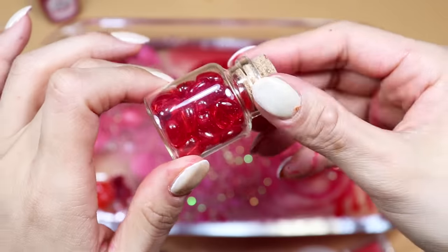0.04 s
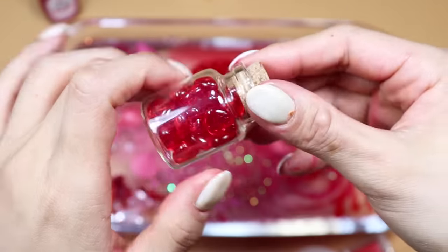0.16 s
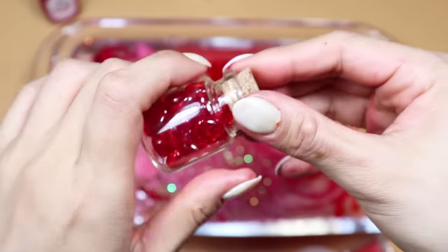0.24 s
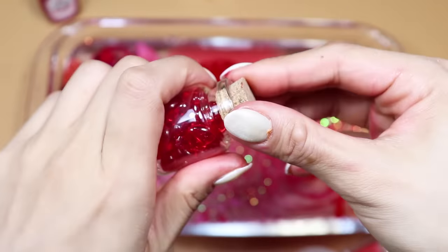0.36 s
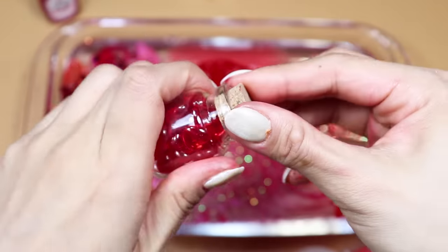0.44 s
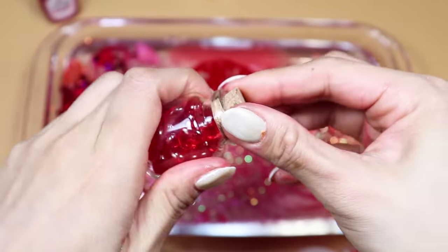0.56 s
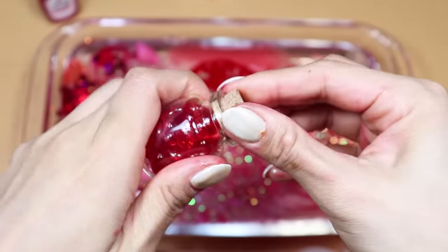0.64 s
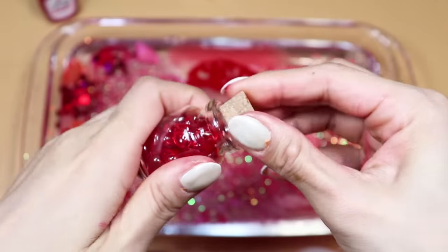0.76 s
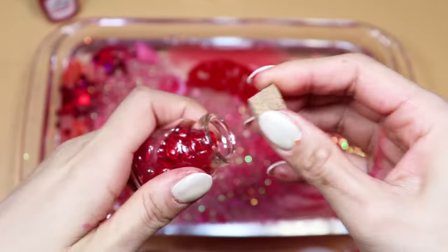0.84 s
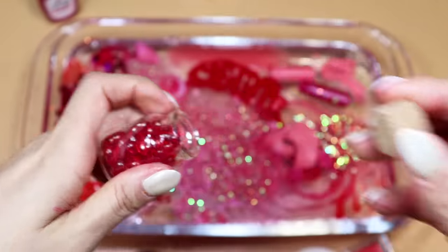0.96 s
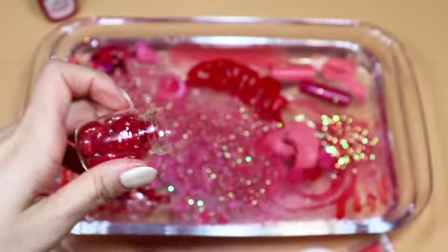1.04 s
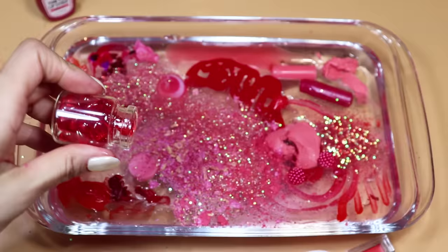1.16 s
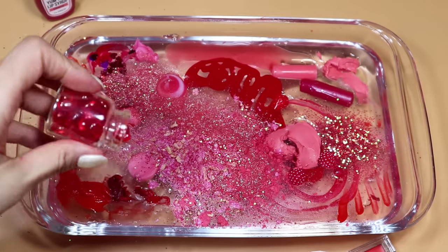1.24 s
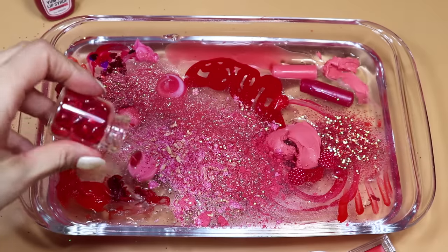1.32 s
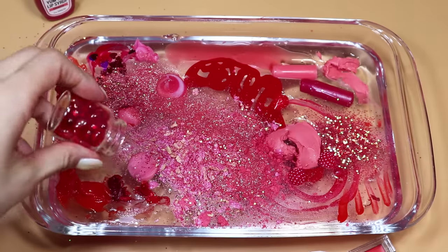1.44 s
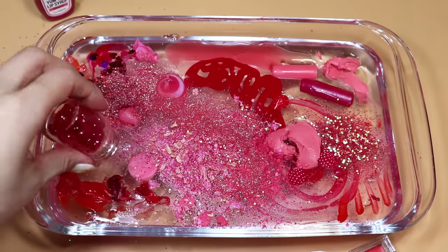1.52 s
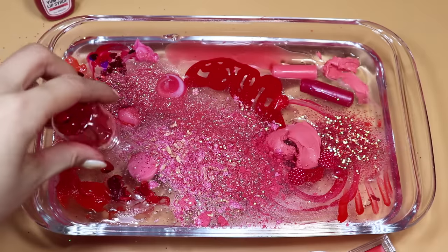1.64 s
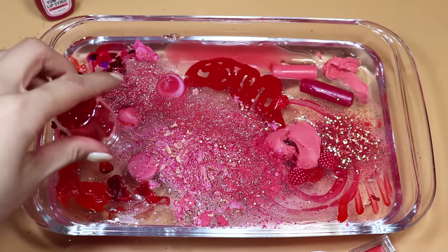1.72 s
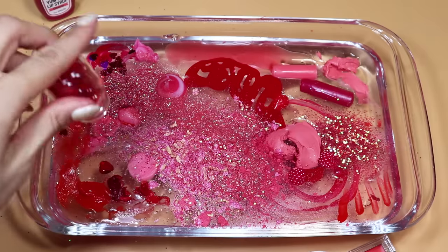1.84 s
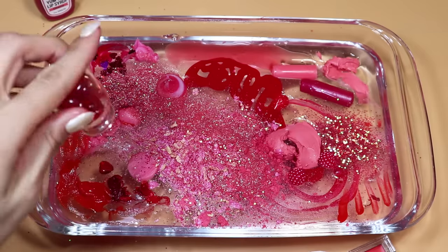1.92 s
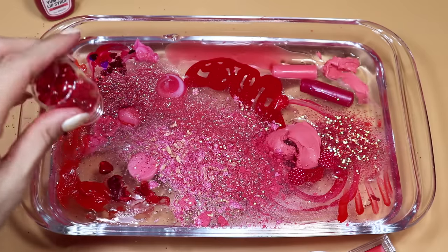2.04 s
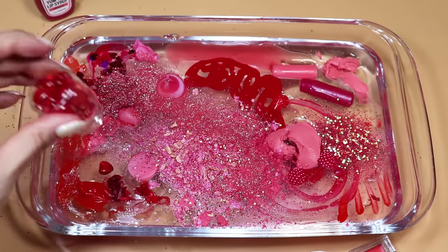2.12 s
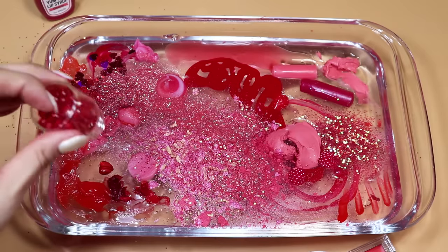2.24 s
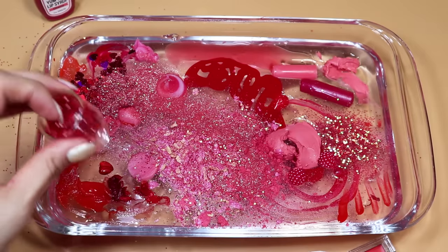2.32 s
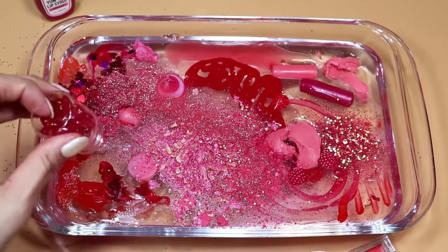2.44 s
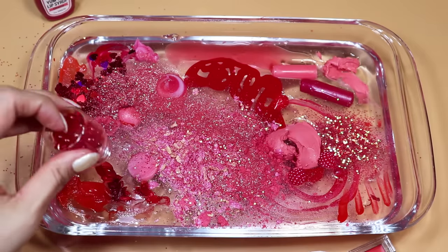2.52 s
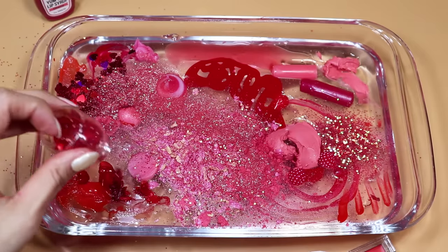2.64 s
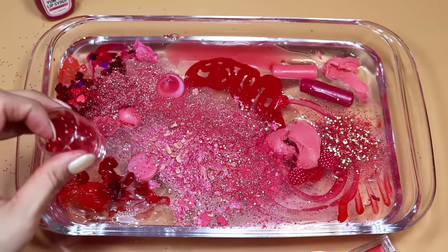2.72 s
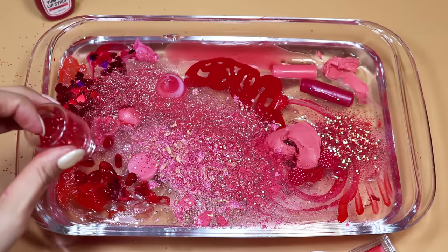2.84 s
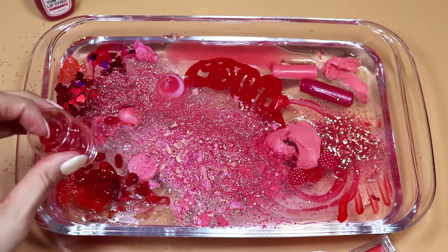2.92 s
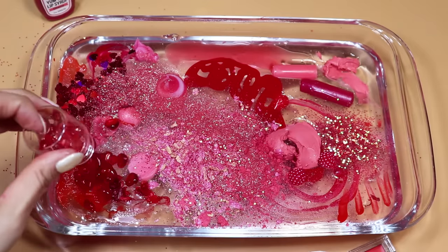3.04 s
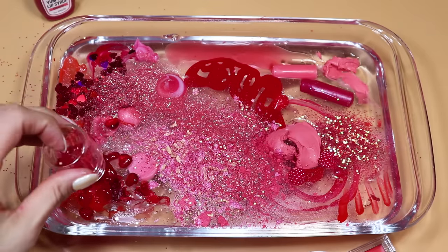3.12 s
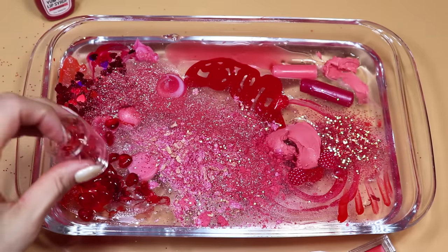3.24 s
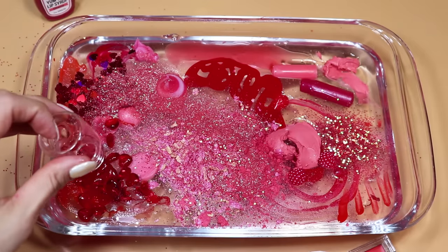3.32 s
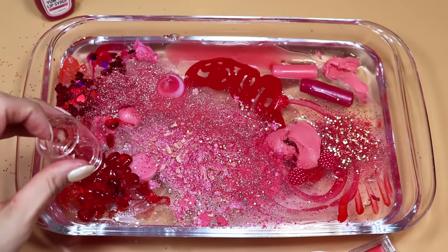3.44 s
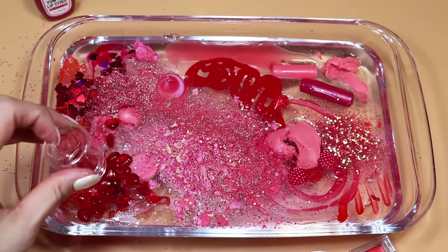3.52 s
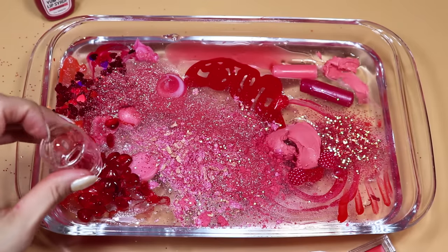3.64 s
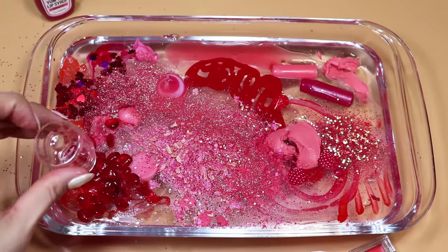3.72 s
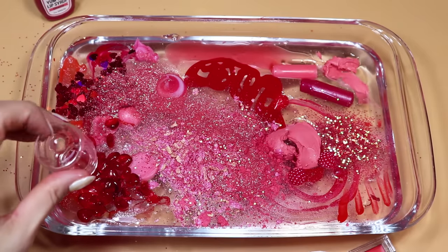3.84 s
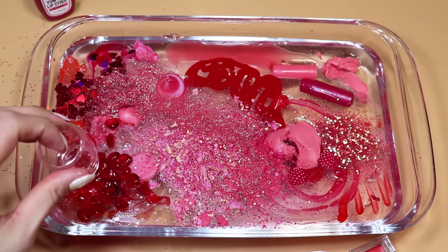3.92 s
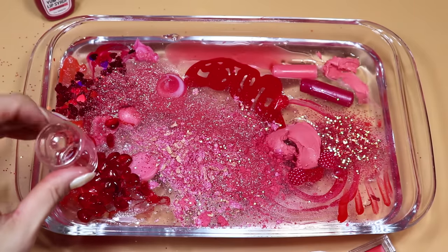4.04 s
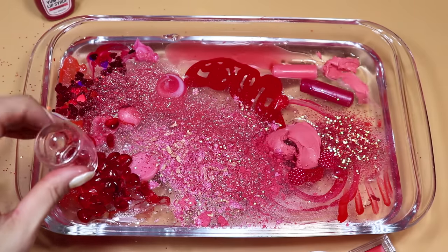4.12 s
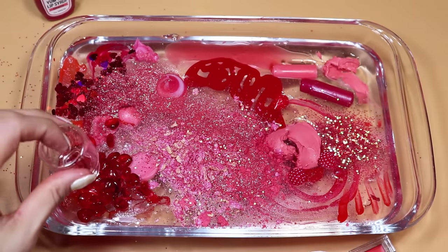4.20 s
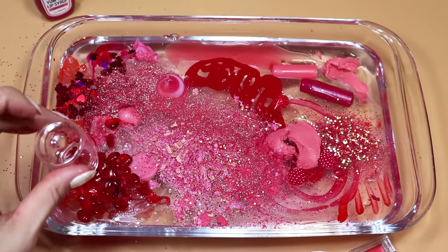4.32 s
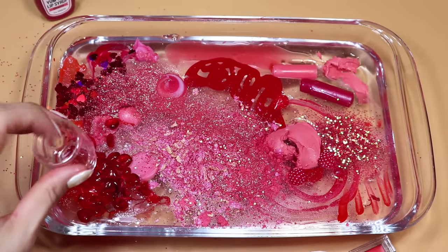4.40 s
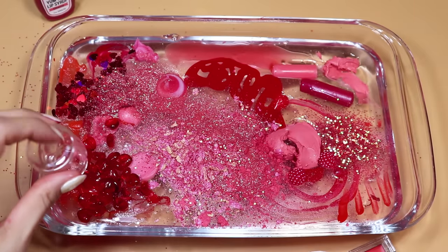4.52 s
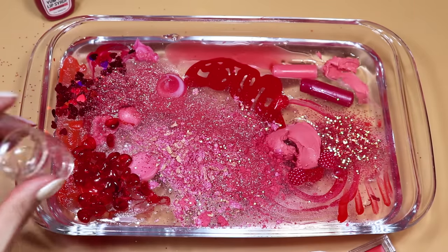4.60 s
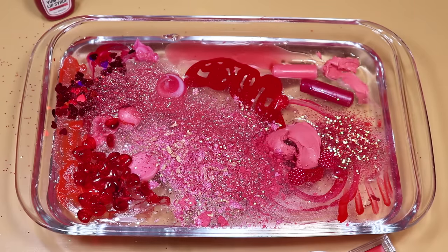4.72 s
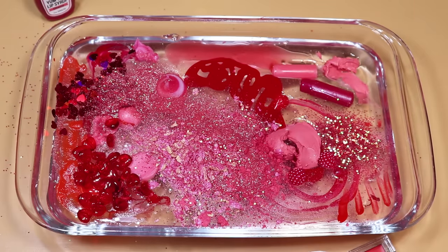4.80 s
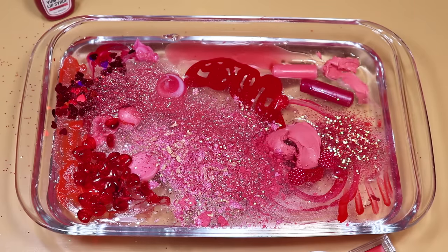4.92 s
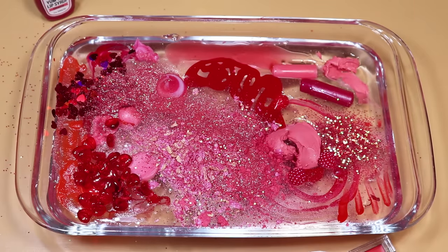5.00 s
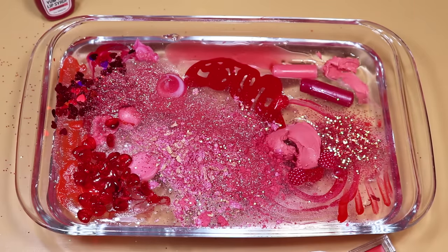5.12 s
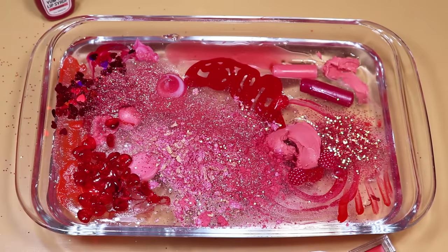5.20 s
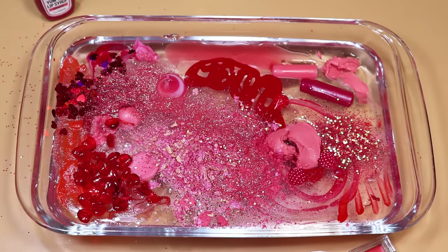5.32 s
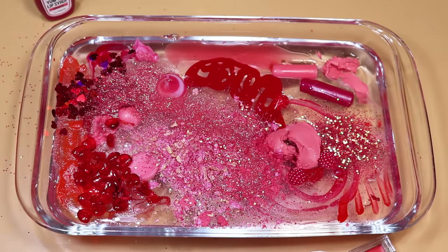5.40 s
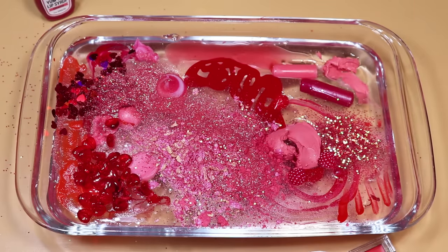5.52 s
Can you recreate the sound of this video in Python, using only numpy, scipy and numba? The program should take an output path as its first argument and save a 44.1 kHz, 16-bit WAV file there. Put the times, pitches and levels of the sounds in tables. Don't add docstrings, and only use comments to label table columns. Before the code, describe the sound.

Close stereo capture, slightly left: a few delicate ticks, then a light flurry of glassy clicks as beads shift in a small bottle. A dense, uneven rattle comes in short spurts for over a second, brittle and high with a little hollow knock from the bottle's air. It stops abruptly, leaving isolated taps, one soft plop, and faint indoor hum and hiss.

```python
import sys
import numpy as np
from scipy import signal
from scipy.fft import rfft, irfft, next_fast_len
from scipy.io import wavfile
from scipy.ndimage import uniform_filter1d
from numba import njit

SR = 44100
rng = np.random.default_rng(int(sys.argv[2]) if len(sys.argv) > 2 else 0)


def store_pcm(level_fs):
    pcm = np.round(np.clip(level_fs, -1, 1) * 32767).astype(np.int16)
    wavfile.write(sys.argv[1], SR, np.atleast_2d(pcm).T)


def ratio(d):
    e = np.asarray(d, float) / 20
    return 10 ** e


N = 245333


def rms_one(x):
    return x / np.sqrt(np.mean(x ** 2) + 1e-20)


def in_time(rows, column):
    rows = np.array(rows, float)
    return np.interp(np.arange(N) / SR, rows[:, 0], rows[:, column])


def band(x, low_hz, high_hz):
    return signal.sosfilt(signal.butter(3, [low_hz, high_hz], "band", fs=SR, output="sos"), x)


@njit
def resonate(x, angle, r):
    y = np.zeros(len(x))
    for i in range(2, len(x)):
        y[i] = np.sin(angle[i]) * x[i - 1] + 2 * r * np.cos(angle[i]) * y[i - 1] - r * r * y[i - 2]
    return y


def ring(clicks, hz, width_hz):
    angle = 2 * np.pi * hz / SR * np.ones(N)
    return resonate(clicks + 1e-18, angle, np.exp(-np.pi * width_hz / SR))


# f/Hz, density/dB per Hz
ROOM_TONE = [(18, -54), (30, -31), (53, -2.5), (138, -4), (170, -4), (233, -3), (364, -10), (649, -10),
             (721, -14.5), (1350, -14.5), (1460, -15), (1590, -16.5), (12000, -30), (13300, -100),
             (16000, -33)]
# f/Hz, correlation/1
ROOM_LIKENESS = [(60, 0.84), (130, 0.62), (290, 0.55), (640, 0.29), (1410, -0.036), (3100, -0.05),
                 (6820, 0.17), (15000, -0.41)]
# f/Hz, width/Hz, level/dB
APPLIANCE_WHINES = [(1330, 47, -71), (13200, 28, -108)]


def background():
    tone_db, settle = -53 + 1.38, 8000
    edges_hz = 28 * 2 ** np.arange(0, 9.6, .5)
    white = rng.standard_normal((2, 2, N + settle))
    tone = 0
    for k, (low, high) in enumerate(zip(edges_hz, edges_hz[1:])):
        sos = signal.butter(2, [low, high], "band", fs=SR, output="sos")
        mid, side = signal.sosfilt(sos, white[k % 2])[:, settle:]
        log_centre = np.log(low * high) / 2
        tone_hz, density_db = np.transpose(ROOM_TONE)
        likeness_hz, likeness = np.transpose(ROOM_LIKENESS)
        level_db = np.interp(log_centre, np.log(tone_hz), density_db)
        alike = np.clip(np.interp(log_centre, np.log(likeness_hz), likeness), -1, 1)
        tone = tone + ratio(level_db) * (np.sqrt(1 + alike) * mid + np.sqrt(1 - alike) * side * [[1], [-1]])
    whines = 0
    for hz, width_hz, db in APPLIANCE_WHINES:
        once = ring(rng.standard_normal(N), hz, width_hz)
        whines = whines + ratio(db) * rms_one(ring(once, hz, width_hz))
    return ratio(tone_db) * rms_one(tone) + whines


# t/s, f/Hz
AIR_PITCH = [(0.8, 1700), (1.08, 1700), (1.19, 1670), (1.67, 1810), (2.21, 1795), (2.93, 1370), (3.1, 1360),
             (3.58, 1555), (4.7, 1540)]
# t/s, f/Hz, level/dB
CROSS_MODE = [(0.8, 5100, 0), (1.11, 4400, 7), (1.26, 4140, 10.5), (1.33, 5450, 6), (2.76, 5430, -2.5),
              (3.03, 6460, -1), (3.3, 6630, -4.5), (3.6, 6600, -13)]
# f/Hz, width/Hz, level/dB
BODY_MODES = [(2730, 460, -22), (3800, 6800, -10.5), (7880, 1500, -1.5), (9630, 2070, 5)]
# f/Hz, width/Hz, level/dB
CRACK_MODES = [(15650, 1700, 0), (13900, 1500, -6), (11600, 2500, -14)]
# f/Hz, width/Hz, level/dB
WALL_MODES = [(15080, 110, 0), (15300, 150, -5), (13600, 300, -14)]


def bottle(strike, air, body, crack, wall, cavity_db):
    def modes(table, strength, first):
        return sum(ratio(db) * ring(strike(strength, first + k), hz, width_hz)
                   for k, (hz, width_hz, db) in enumerate(table))

    air_hz = in_time(AIR_PITCH, 1)
    thump = ring(strike(air, 0), air_hz, 85)
    thump = thump + ratio(-10.5) * ring(strike(air, 12), 2.9 * air_hz, 500)
    thump = thump + ratio(-4.5) * ring(strike(air, 12), 1.36 * air_hz, 300)
    cross_gain = ratio(cavity_db + in_time(CROSS_MODE, 2))
    middle = cross_gain * ring(strike(body, 1), in_time(CROSS_MODE, 1), 420)
    middle = middle + modes(BODY_MODES, body, 2)
    top = modes(CRACK_MODES, crack, 6) + modes(WALL_MODES, wall, 9)
    return band(thump, 780, 3200), band(middle, 2220, 12000), band(top, 10300, 19000)


# t/s, crack peak/dB, body peak/dB, air peak/dB
FAINT_TICKS = [(0.384, -58, -48, -56), (0.4024, -67, -55, -55), (0.8358, -63, -42, -53),
               (0.8396, -61, -51, -59), (0.8677, -63, -57, -56), (0.883, -52, -53, -54),
               (0.888, -48, -46, -56), (0.8967, -45, -41, -44), (0.9048, -53, -59, -60),
               (1.1094, -51, -52, -61), (1.1973, -67, -55, -64), (1.2116, -35, -29.5, -44),
               (1.2378, -34, -35.5, -48), (1.291, -58, -42, -37.5), (1.3099, -44, -38, -44),
               (1.333, -48, -46, -50), (1.3372, -41, -34.5, -43), (1.3623, -38, -39, -45),
               (1.3681, -45, -36.5, -54), (1.381, -37, -48, -45), (1.481, -62, -51, -49),
               (1.658, -40, -41.5, -49), (1.723, -60, -52, -63), (1.735, -39, -39.5, -38),
               (1.7836, -51, -44, -47), (2.119, -42, -51, -59), (2.1503, -39, -49, -54),
               (2.1587, -39, -49, -49), (2.2022, -39, -44, -46), (4.7437, -48, -48, -55)]
# t/s, crack peak/dB, body peak/dB, air peak/dB
BEAD_KNOCKS = [(2.32, -28.0, -26.0, -29.0), (2.3896, -41.0, -40.0, -58.0), (2.4496, -26.0, -24.0, -28.0),
               (2.4664, -20.0, -21.0, -28.0), (2.5139, -30.0, -38.0, -56.0), (2.6016, -28.0, -28.0, -29.0),
               (2.6402, -27.0, -29.0, -40.0), (2.7175, -23.0, -25.0, -30.0), (2.7517, -21.0, -27.0, -43.0),
               (2.7597, -23.0, -24.0, -42.0), (2.8244, -25.0, -26.0, -45.0), (2.866, -23.0, -31.0, -28.0),
               (2.9235, -22.0, -26.0, -47.0), (2.951, -27.0, -25.0, -39.0), (2.9685, -26.0, -35.0, -40.0),
               (2.9888, -24.0, -30.0, -36.0), (3.0249, -21.0, -34.0, -48.0), (3.0367, -18.0, -30.0, -47.0),
               (3.0659, -26.0, -26.0, -33.0), (3.1, -25.0, -28.0, -34.0), (3.142, -21.0, -33.0, -40.0),
               (3.2263, -32.0, -34.0, -35.0), (3.2566, -18.0, -29.0, -37.0), (3.5191, -26.0, -29.0, -68.0),
               (3.547, -36, -40, -60), (3.5785, -25, -32, -60), (3.646, -45, -52, -65),
               (3.315, -28, -34, -45), (2.618, -32, -34, -36), (3.172, -31, -36, -55)]
# t/s, crack peak/dB, body peak/dB, air peak/dB
WALL_RINGS = [(2.9935, -20.0, -31.0, -48.0), (3.003, -24, -32, -36), (3.012, -25, -33, -36),
              (3.3683, -19.0, -28.0, -31.0), (3.3875, -18.0, -24.0, -29.0), (3.3967, -23.0, -33.0, -35.0),
              (3.4049, -21.0, -28.0, -42.0), (3.4599, -20.0, -26.0, -31.0)]
# t/s, crack peak/dB, body peak/dB, air peak/dB, wall re crack/dB
GLASS_STRIKES = [(1.9674, -7.0, -39, -46.0, -33.0), (2.2589, -19.0, -36, -44.0, -10.0),
                 (2.2636, -17.0, -30, -38.0, -4.0), (2.2678, -9.0, -30, -45.0, -25.0),
                 (2.4025, -8.0, -31, -40.0, -17.0), (2.4058, -9.0, -30, -41.0, -27.0),
                 (2.4116, -13.0, -26, -47.0, -22.0), (2.5518, -8.0, -31, -39.0, -32.0),
                 (2.5586, -9.0, -33, -56.0, -30.0), (2.6284, -18.0, -29, -37.0, -29.0),
                 (2.6811, -7.0, -35, -39.0, -18.0), (2.6957, -11.0, -33, -56.0, -15.0),
                 (2.8109, -18.0, -25, -42.0, -26.0), (2.8739, -16.0, -30, -36.0, -18.0),
                 (3.1128, -17.0, -32, -41.0, -24.0), (3.1966, -18.0, -30, -47.0, -33.0),
                 (3.2369, -18.0, -25, -29.0, -23.0), (3.2976, -17.0, -34, -55.0, -28.0),
                 (3.3583, -13.0, -22, -34.0, -31.0), (3.487, -16.0, -25, -56.0, -22.0),
                 (3.573, -17.0, -25, -51.0, -31.0), (3.9949, -19.0, -42, -44.0, -34.0),
                 (4.2697, -11.0, -37, -38.0, -38.0), (4.535, -12.0, -37, -37.0, -32.0)]


def blows():
    mode_spread_db, side_spread_db = 1.2, 1.2
    rattle_s, echo_s, echo_db = .0014, .00063, -20
    # wall re crack/dB, left re right/dB
    rows = [(*row, -24, 2) for row in FAINT_TICKS]
    rows += [(*row, -21, 3) for row in BEAD_KNOCKS]
    rows += [(*row, -1.5, 3) for row in WALL_RINGS]
    rows += [(*row[:4], row[4] + 7, 5.5) for row in GLASS_STRIKES]
    s, crack_db, body_db, air_db, wall_db, left_db = np.transpose(rows)
    at = np.round(s * SR).astype(int)
    mode_luck, side_luck = rng.standard_normal((2, len(s), 13))
    chatter, fade = rng.standard_normal((6, N)), np.exp(-1 / (rattle_s * SR))
    sides = []
    for side in (1, -1):
        def strike(db, k):
            pan_db = side_spread_db * side_luck[:, k] + left_db / 2
            off_centre = side * (k % 12 > 0)
            clicks = np.zeros(N)
            clicks[at] = ratio(db + mode_spread_db * mode_luck[:, k] + off_centre * pan_db)
            if 0 < k < 6:
                rattle = chatter[k] * signal.lfilter([1], [1, -fade], clicks)
                return 0.9 * clicks + 0.65 * rattle
            return clicks
        parts = bottle(strike, air_db - 0.5, body_db - 1.0, crack_db + 2, crack_db + wall_db, cavity_db=-14)
        sides.append(sum(parts))
    direct = np.array(sides)
    return direct + ratio(echo_db) * np.roll(direct, int(echo_s * SR), axis=1)


def place(x):
    lead_s, size = .000056, next_fast_len(N)
    hz = np.arange(size // 2 + 1) * SR / size
    late = irfft(rfft(x[1], size) * np.exp(-2j * np.pi * hz * lead_s), size)[:N]
    return np.array([x[0], late])


def room(x):
    t60_s, level_db = .19, -9
    t = np.arange(int(.4 * SR)) / SR
    onset = np.clip((t - .0015) / 0.0019, 0, 1)
    tail = rng.standard_normal((2, len(t))) * ratio(-60 * t / t60_s) * onset
    tail = tail / np.sqrt(np.sum(tail ** 2, axis=1, keepdims=True))
    return ratio(level_db) * signal.fftconvolve(x.mean(axis=0)[None], tail, axes=1)[:, :N]


# start t/s, hold/s, air level/dB, body level/dB, crack level/dB
WRIST_SHAKES = [(0.828, 0.031, -61.0, -58, -75), (1.288, 0.066, -55.5, -63, -57),
                (1.69, 0.046, -58.5, -66, -77), (1.987, 0.0081, -44, -50, -68),
                (2.262, 0.01, -40.5, -37.5, -47), (2.318, 0.0033, -35, -30.5, -38.0),
                (2.402, 0.032, -46, -41.0, -64), (2.44, 0.034, -32.5, -33, -32),
                (2.544, 0.045, -47, -41, -50.0), (2.586, 0.046, -38, -37, -31),
                (2.708, 0.048, -35.5, -31, -26.5), (2.814, 0.048, -43.5, -36.5, -35),
                (2.871, 0.027, -35, -31.5, -24.5), (2.913, 0.021, -42, -31, -31),
                (2.96, 0.071, -39.5, -34, -27), (3.061, 0.0057, -42, -39, -44.0),
                (3.108, 0.034, -45, -36, -24), (3.189, 0.026, -46.0, -38, -33),
                (3.221, 0.045, -36.5, -31.5, -26.5), (3.35, 0.072, -41.0, -35.5, -30),
                (3.455, 0.0055, -43.5, -46.0, -47), (3.487, 0.013, -48.0, -35.5, -30),
                (3.57, 0.016, -71, -40.5, -24.5)]
SETTLE_RATES = [432, 431, 600]


def shaken(layer):
    attack_s = .004
    t, power = np.arange(N) / SR, 0
    for s, hold_s, *level_db in WRIST_SHAKES:
        rise = np.clip(1 + (t - s) / attack_s, 0, 1) ** 2
        fall_db = SETTLE_RATES[layer] * np.maximum(t - s - hold_s, 0)
        power = power + rise * ratio(2 * (level_db[layer] - fall_db))
    return np.sqrt(power)


def tumble():
    per_s, spread_db, alike = 2500, 2.4, .75
    heights = ratio(spread_db * np.minimum(rng.exponential(1, N), 4))
    knocks = (rng.random(N) < per_s / SR) * heights
    shared, own = rng.standard_normal((2, 13, N))
    own[[0, 12]] *= .3
    levels = [shaken(k) * ratio(db) for k, db in enumerate([-1.5, 1.5, -3.5])]
    sides = []
    for side in (1, -1):
        luck = shared + side * np.sqrt(1 - alike) * own
        parts = bottle(lambda gain, k: gain * knocks * luck[k], 1, 1, 1, ratio(-36), cavity_db=-2.5)
        mix = sum(rms_one(part) * level for part, level in zip(parts, levels))
        sides.append(ratio(0.13 * side) * mix)
    return np.array(sides)


# t/s, peak level/dB, f/Hz, t60/s
GEL_BUBBLE = [
    (5.3758, -41, 1406, 0.1),
]


def plop():
    (s, db, hz, t60_s), = GEL_BUBBLE
    t = np.maximum(np.arange(N) / SR - s, 0)
    return ratio(db - 60 * t / t60_s) * np.sin(2 * np.pi * hz * t)


def scene():
    near = blows() + tumble() + plop()
    return place(near) + room(near) + background()


def band_limit(x):
    return signal.sosfilt(signal.butter(12, 17160, fs=SR, output="sos"), x)


def record(dry):
    gate_db, jump_db = -58, 9
    kept, wide = (signal.sosfiltfilt(signal.cheby2(14, 40, hz, fs=SR, output="sos"), dry)
                  for hz in (16000, 16750))
    top = wide - kept
    near, around = (uniform_filter1d(top ** 2, size=size).max(axis=0) for size in (256, 4096))
    loud = near / (ratio(2 * gate_db) + around * ratio(2 * jump_db))
    mix = kept + top * loud ** 2 / (1 + loud ** 2)
    return band_limit(mix)


dry = scene()
out = record(dry)
store_pcm(out)
```